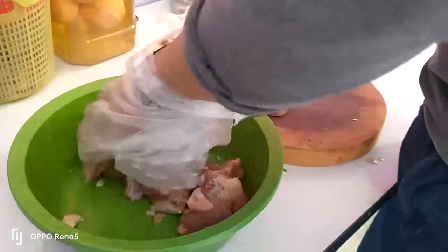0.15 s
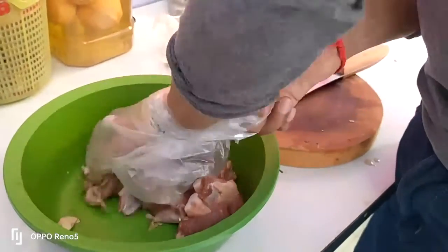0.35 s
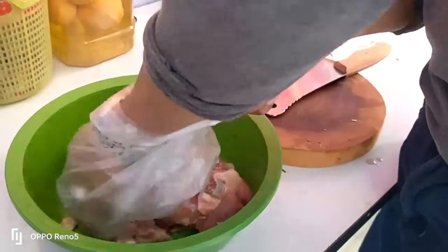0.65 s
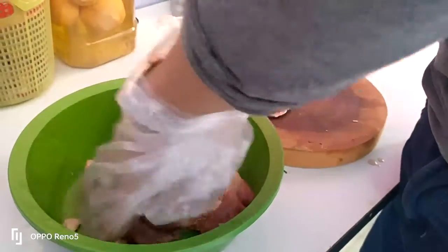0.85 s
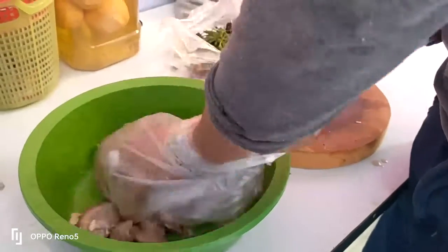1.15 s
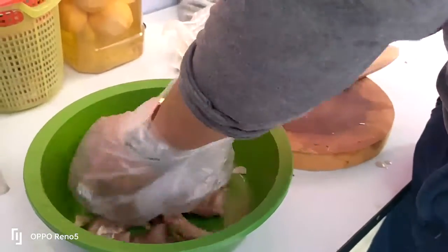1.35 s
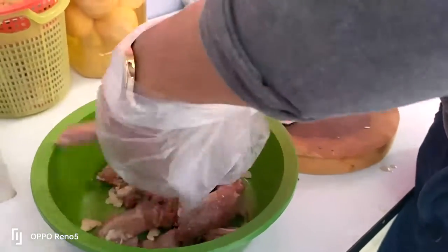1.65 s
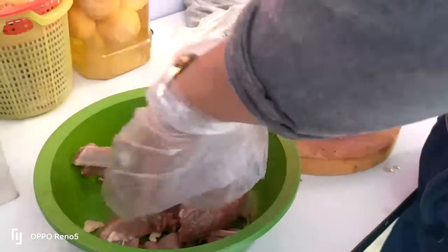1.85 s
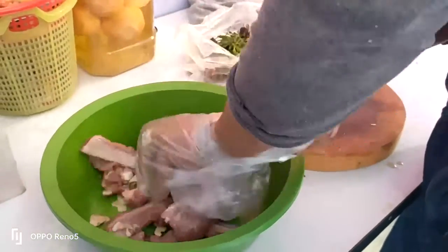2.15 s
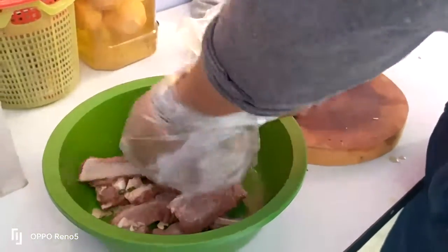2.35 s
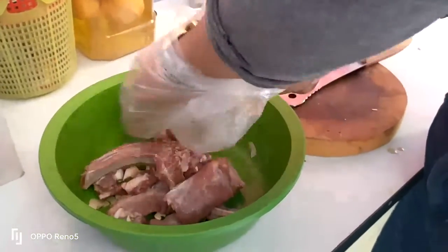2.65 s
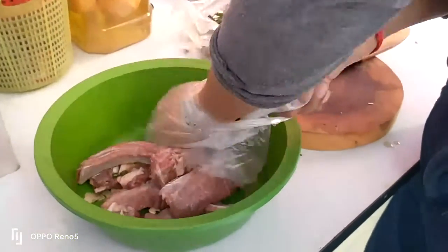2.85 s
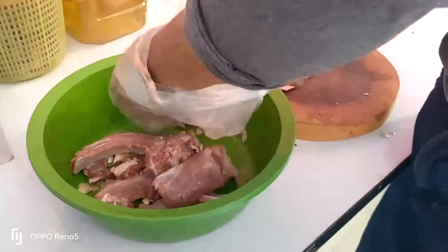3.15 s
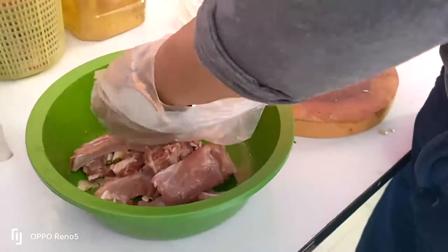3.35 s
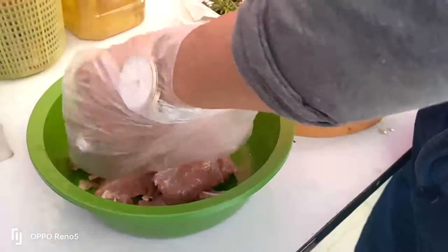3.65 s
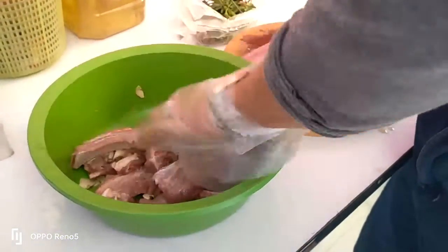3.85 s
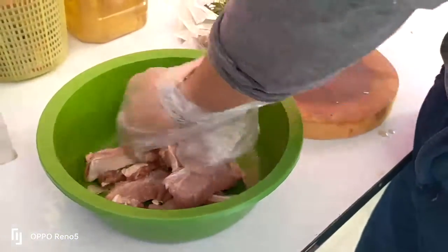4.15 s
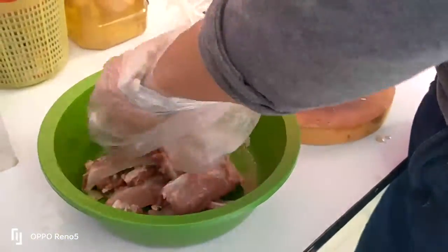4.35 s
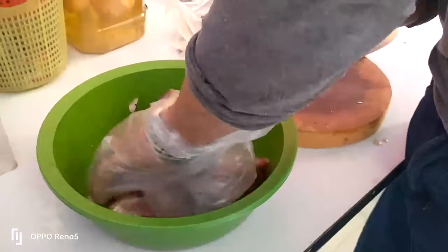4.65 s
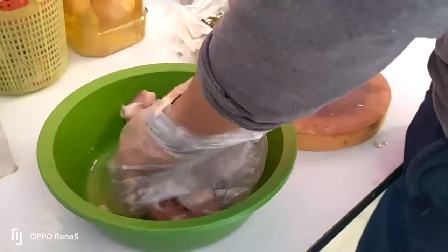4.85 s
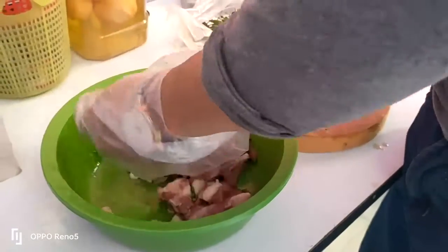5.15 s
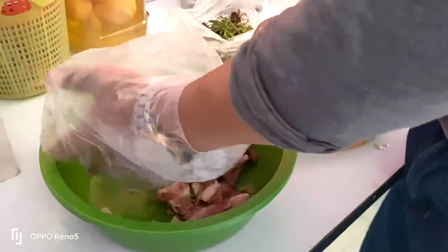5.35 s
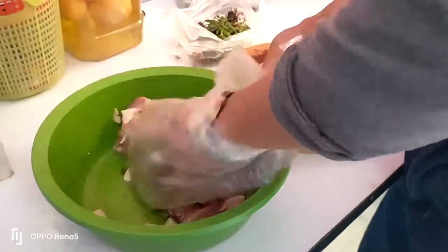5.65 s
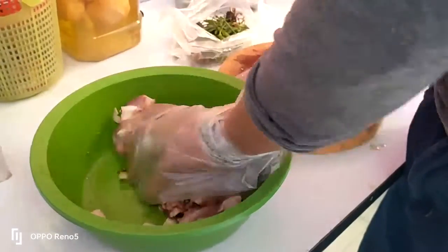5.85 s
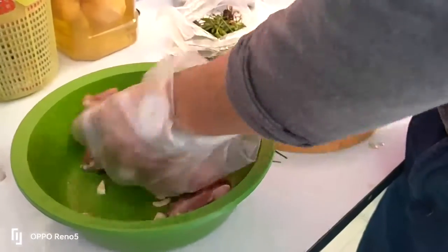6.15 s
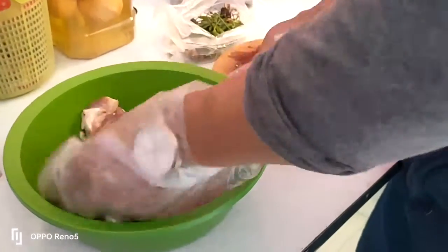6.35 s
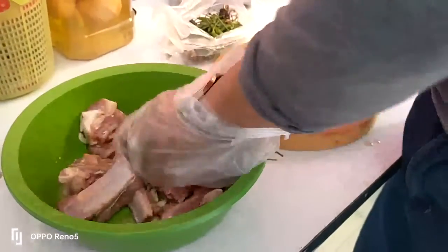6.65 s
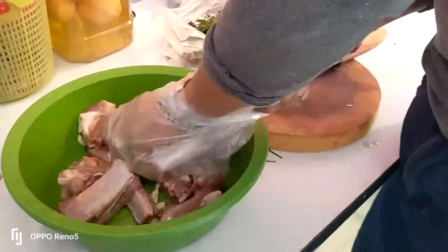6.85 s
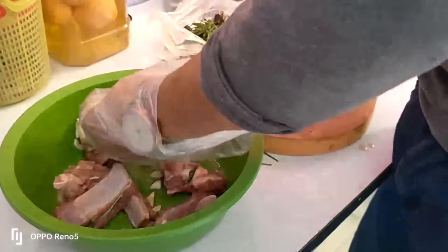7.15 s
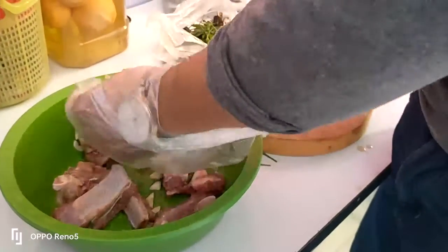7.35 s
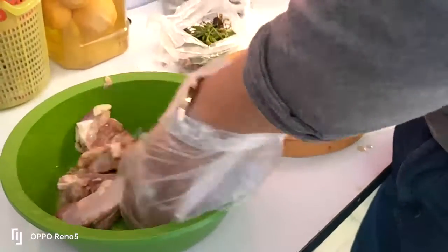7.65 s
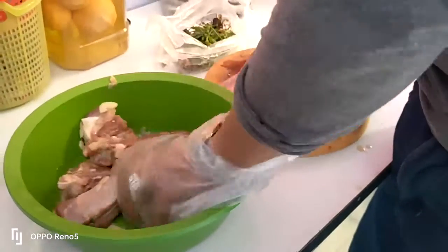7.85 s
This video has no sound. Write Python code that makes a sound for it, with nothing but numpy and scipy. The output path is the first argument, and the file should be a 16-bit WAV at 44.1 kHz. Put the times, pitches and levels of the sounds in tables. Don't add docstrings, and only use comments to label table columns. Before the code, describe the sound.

Busy crinkling of plastic film over soft meaty squelches, broken by sharp snaps and hollow bowl knocks, with faint dull thumps underneath.

```python
import sys
import numpy as np
from scipy import signal
from scipy.fft import rfft, irfft, dct, next_fast_len
from scipy.io import wavfile
from scipy.ndimage import uniform_filter1d

SR = 44100
rng = np.random.default_rng(int(sys.argv[2]) if len(sys.argv) > 2 else 0)


def master(y):
    cut = np.clip(np.atleast_2d(y).T, -1, 1)
    pcm = np.round(cut * 32767)
    wavfile.write(sys.argv[1], SR, pcm.astype(np.int16))


def volts_from_db(level):
    exponent = np.asarray(level, float) / 20
    return 10 ** exponent


N = 352359

# start_s, peak_db
THUDS = [(0.028, -58), (0.233, -42), (0.35, -43), (0.512, -40), (0.778, -39), (0.902, -45), (0.991, -46),
         (1.603, -41), (1.704, -53), (1.854, -50), (2.212, -48), (2.828, -45), (2.953, -40), (3.779, -44),
         (4.052, -44), (4.344, -50), (4.465, -56), (4.887, -37.5), (5.154, -39), (5.426, -49), (5.909, -67),
         (6.014, -45), (6.188, -57), (6.297, -43), (6.46, -42), (6.554, -42), (7.12, -42), (7.414, -47),
         (7.514, -38), (7.736, -57)]
THUD_RISE_S, THUD_FALL_S, THUD_HZ = 0.024, 0.032, 65.3
# freq_hz, density_db_per_hz
RUMBLE_COLOUR = [(12, -34), (20, 3), (65, 6), (86, 5.5), (136, -12), (211, -2), (300, -17), (390, -32),
                 (660, -120)]
RUMBLE_DB = -57.5
ROOM_T60_S, ROOM_CUT_HZ, ROOM_DB = 0.45, 2100, -18.5

# start_s, wall_db, hardness_db, wall_hz
KNOCKS = [(0.31, -35, 6, 263), (0.719, -42, -2, 218), (1.0, -16, -0.5, 197), (1.017, -17, -8, 165),
          (1.03, -21, 3, 249), (1.05, -23, -8, 150), (1.069, -23, 4, 466), (1.111, -29, 4, 363),
          (1.427, -19, 4.5, 504), (1.44, -26, -3, 169), (1.767, -12.5, -3, 347), (1.818, -24, -2, 323),
          (2.132, -28.5, 8, 236), (2.333, -27.5, 4, 191), (2.488, -30, 1, 200), (2.529, -30, -8, 221),
          (2.782, -34, -12, 183), (2.825, -21, -4, 240), (2.8294, -16.5, -3, 330), (3.191, -38, -12, 340),
          (3.582, -38, -4, 229), (3.901, -26, -4, 192), (3.971, -24.5, -1, 251), (4.029, -34, -3, 200),
          (4.349, -39, -4, 280), (4.4688, -12, -1.5, 215), (4.484, -15.5, -17, 185), (4.791, -30, 2, 260),
          (5.781, -31, -5, 300), (6.174, -32, -2, 217), (6.406, -23, -16, 353), (6.413, -17, -10, 296),
          (6.439, -24, -12, 253), (6.471, -20, -8, 233), (6.496, -23.5, -6, 320), (6.512, -22, -6, 282),
          (6.525, -30, -7, 190), (6.546, -29, -8, 252), (6.588, -37, -15, 228), (6.566, -28, -13, 310),
          (6.799, -31, 6, 302), (7.512, -22, -2, 281), (7.771, -23.5, -6, 235), (7.86, -31, 3, 236)]
# freq_hz, level_db, t60_s
BOWL_MODES = [(183, -9, 0.47), (280, -12, 0.1), (496, -2, 0.013), (712, 4.5, 0.049), (980, -3, 0.025),
              (1560, -22, 0.014)]
CRACK_DB, CRACK_HZ, CRACK_T60_S = -25, 1270, 0.0026
# start_s, peak_db, fall_s, pitch_hz
BOOMS = [(0.309, -39.5, 0.082, 114), (.565, -46, 0.025, 119), (.65, -50, .08, 226),
         (1.009, -34.5, 0.057, 114), (1.44, -45.5, 0.12, 113), (2.091, -49, 0.047, 121),
         (2.375, -52, .08, 114), (2.836, -28.5, 0.053, 114), (2.98, -46, .04, 110), (3.876, -47, .04, 115),
         (3.957, -45, 0.029, 116), (4.08, -50, 0.094, 204.5), (4.477, -24.5, 0.1, 114.5),
         (4.465, -31, .05, 190.4), (4.54, -39, 0.049, 188), (4.49, -40, 0.06, 287), (4.62, -45, 0.015, 304),
         (4.648, -40, 0.084, 118), (4.783, -51, .05, 119), (5.234, -47, .08, 327), (6.468, -34, 0.034, 120),
         (6.506, -41, 0.08, 117), (6.802, -42.5, 0.038, 116), (7.528, -31, 0.067, 117.3),
         (7.535, -47, .07, 174.4), (2.84, -45, 0.057, 185), (6.49, -45, 0.062, 182),
         (7.642, -47, 0.049, 120), (7.785, -50, 0.034, 116), (7.86, -49, 0.044, 117)]
BOOM_RISE_S = 0.00793

# start_s, peak_db, pitch_hz, pan_left_minus_right_db, noise_share_db
SNAPS = [(0.31, -27, 4150, -5, -3), (1.065, -10.5, 1950, -2, -6), (1.432, -26, 1787, -27, -21.5),
         (1.431, -22, 970, 0, -16), (1.768, -17, 1480, 0, -15), (1.822, -19, 2470, 5.5, -8),
         (2.3672, -20.5, 5160, 6, -9), (2.62, -19, 5800, -6, -20), (2.8047, -42, 4300, 3, -9),
         (2.8306, -14, 1670, 2.5, -20), (2.844, -20, 1900, 2, -12), (2.835, -6, 5620, -1, -19),
         (3.119, -11.5, 5540, -6, -22), (3.3382, -28, 4760, -6, -3), (3.8472, -27, 5600, 0, -20),
         (4.4696, -14.5, 2650, 15, -16), (4.481, -11, 2650, -1, -13), (5.638, -27, 4400, 6, -3),
         (5.7818, -10, 1990, 2, -19), (4.469, -9.5, 1930, 5, -16), (6.417, -16.5, 1420, -4, -11),
         (6.42, -10, 4040, 0, -14), (6.447, -12, 3140, 2, -14), (6.43, -18, 2000, 4, -7),
         (6.463, -15, 2830, -7, -7), (6.402, -18, 5070, -2, 2), (6.407, -19, 4500, -2, -5),
         (6.421, -17, 1420, -5, -12), (6.437, -12, 2600, 0, -15), (6.453, -18, 2200, 5, -10),
         (6.4728, -5, 1450, -4, -27), (6.471, -12.5, 2630, -4, -16), (7.5125, -12.5, 1980, -1, -21),
         (7.658, -22, 3900, 6, -1), (7.7715, -17.5, 2270, 6, -15)]
# start_s, peak_db, pitch_hz, pan_left_minus_right_db,
# noise_share_db
MORE_SNAPS = [(6.4168, -14, 6000, -8, 3), (7.5192, -23, 1920, 3, -12), (7.523, -17, 1950, 3, -17),
              (7.52, -24, 1350, 7, -17), (6.496, -15, 1400, -2, -10), (2.2, -21, 6000, 4, -1),
              (1.925, -21, 3500, -1, 2), (7.8, -25.5, 1500, 0, -4), (6.484, -26, 1300, 3, -14),
              (5.9, -17, 1630, 2, -12), (4.504, -15, 2600, 2, -10)]

# peak_s, film_db, fall_s, wetness_re_film_db
SQUEEZES = [(0.005, -28.5, 0.089, -18.5), (0.174, -26, 0.1, -22), (0.351, -26.5, 0.11, -14.5),
            (0.55, -26.5, 0.037, -13.5), (0.684, -31, 0.33, -20.5), (1.068, -26, 0.29, -18),
            (1.615, -31, 0.17, -20.5), (2.014, -25.5, 0.24, -16.5), (2.407, -30, 0.061, -16.5),
            (2.618, -29.5, 0.16, -17), (2.851, -21.5, 0.06, -13.5), (3.049, -30, 0.16, -20.5),
            (3.394, -32, 0.079, -20.5), (3.611, -27.5, 0.075, -16), (3.956, -24, 0.21, -16),
            (4.344, -29.5, 0.09, -15.5), (4.492, -23, 0.04, -18), (4.618, -25.5, 0.074, -14),
            (4.731, -29, 0.04, -16.5), (4.98, -29.5, 0.3, -20.5), (5.442, -32, 0.16, -17.5),
            (5.65, -28.5, 0.058, -22), (5.781, -26, 0.14, -13.5), (6.044, -31, 0.29, -19.5),
            (6.443, -28, 0.13, -16.5), (6.766, -29, 0.16, -14), (7.136, -30.5, 0.11, -18.5),
            (7.353, -32, 0.065, -23), (7.548, -32.5, 0.1, -13.5), (7.841, -25.5, 0.2, -15)]
RISE_SHARE, REST_DB, WET_REST_DB = 0.65, -40, -50
# peak_s, film_db
CRINKLES = [(.31, -27.5), (.425, -28), (1.917, -25.5), (2.15, -28), (2.66, -28.5), (3.12, -32), (3.94, -26),
            (4.14, -29.5), (5.12, -33), (5.506, -30.5), (5.785, -18), (5.94, -32), (6.407, -26),
            (6.43, -26.5), (5.64, -27), (7.97, -36)]
CRINKLE_RISE_S, CRINKLE_FALL_S = 0.016, 0.019
# time_s, sheen_re_film_db
TAUTNESS = [(0, -20), (.7, -19.5), (1.1, -19.5), (1.7, -19), (1.93, -17.5), (2.3, -20), (2.75, -18),
            (3.0, -19.5), (3.42, -20.5), (3.75, -16.5), (4.1, -20), (5.0, -19), (5.6, -17.5), (5.948, -21),
            (6.3, -17), (6.45, -19), (6.7, -19), (8, -18)]
HUSHES_S = [.9, 1.24, 2.591, 2.98, 3.3, 3.45, 4.201, 4.45, 5.05, 5.3, 5.37, 5.62, 6.88, 7.47, 7.494]
HUSH_S, HUSH_SHARE = 0.012, 0.72
# centre_s, half_length_s, depth_db
DIPS = [
    (2.588, 0.011, -26),
    (3.5, 0.0076, -1),
    (3.2, 0.017, -18),
    (6.877, 0.0065, -22),
    (7.467, 0.011, -16),
    (4.436, .016, 1),
    (6.9, .022, -18),
    (8.7, 0.016, -3),
    (5.8, 0.019, -11),
]
DIP_FILM_SHARE = 0.077
SLOP_DB, SLOP_S = -25, 0.072
FLURRY_DB, FLURRY_S = -17.5, 0.011
PAN_DB, SWAY_DB = 0.45, -0.8

# freq_hz, density_db_per_hz
FILM_LEFT = [(700, -19), (1400, -8.5), (2100, 1), (2750, 2), (3480, -2), (4100, 3), (4900, -7), (5800, 1.5),
             (6500, -6.5), (6900, -3), (7600, -8), (8150, -15)]
FILM_RIGHT = [(700, -46), (1400, -5.5), (2100, -2.5), (2750, 0.5), (3480, -1), (4100, 1), (4600, 1),
              (5800, 3), (6500, -1.5), (7000, -4), (7400, -13), (7560, -12), (7850, -16), (8100, -39)]
SHEEN_LEFT = [(7900, -12), (8400, 0), (11300, -2.5), (11800, -3.5), (13200, -2), (14800, -9), (15800, -2)]
SHEEN_RIGHT = [(7900, -16), (8900, -5), (10000, -10.5), (11200, -4), (12400, -14), (13600, -3),
               (15800, -18)]
# freq_hz, density_db_per_hz
SQUELCH_COLOUR = [(76, -18), (130, -15), (236, -3), (377, -5.5), (531, -3.5), (792, -6), (919, -0.5),
                  (2000, -8), (2600, -67), (4400, -120)]
# freq_hz, share
LIKENESS = [(60, 0.66), (300, 0.77), (640, 0.59), (1400, 0.47), (3000, 0.095), (4300, 0.36), (6000, 0.15),
            (15000, 0.1)]
PORT_LAG_S = -0.000211

# freq_hz, share_of_surrounding_power
GATE_LEFT = [(600, 0), (1500, .15), (2800, .22), (6000, .16), (7300, .36), (8150, 1.1), (8500, .4),
             (13000, .45), (15000, .55)]
GATE_RIGHT = [(600, 0), (1500, .15), (2800, .22), (6000, .16), (7800, .3), (8200, 1.4), (8900, 1.1),
              (9800, .55), (13000, .55), (15000, .65)]
# freq_hz, flicker_db
MOTTLE = [(300, 1.2), (1500, 3.2), (4000, 6.5), (7000, 9), (15000, 11)]
# centre_s, length_s
GAPS = [(0.122, 0.059), (0.615, 0.05), (0.669, 0.012), (0.943, 0.044), (1.012, 0.016), (1.252, 0.045),
        (1.447, 0.038), (1.66, 0.027), (1.83, 0.053), (2.368, 0.047), (2.515, 0.036), (2.59, 0.024),
        (2.736, 0.054), (2.985, 0.028), (3.207, 0.067), (3.325, 0.13), (3.455, 0.07), (4.242, 0.089),
        (4.437, 0.039), (4.649, 0.037), (5.019, 0.059), (5.197, 0.079), (5.394, 0.059), (5.953, 0.036),
        (6.043, 0.096), (6.974, 0.03), (7.071, 0.05), (7.196, 0.057), (7.47, 0.043), (7.974, 0.042)]
GAP_DB_PER_S, GAP_MAX_DB = 950, 52
HOP, LEAD = 1024, 1361
ATTACK_CREST = 5.2
NOTCH_HZ, NOTCH_WIDTH_HZ, NOTCH_DB = 3485, 90, -6
TOP_HZ, BUSY_SHARE = 15100, .8


def rms_one(x):
    return x / np.sqrt(np.mean(x ** 2) + 1e-20)


def at_hz(points, hz):
    points = np.array(points)
    return np.interp(np.log(hz + 1), np.log(points[:, 0]), points[:, 1])


def drift(rate_hz):
    r = np.exp(-80 * np.pi * rate_hz / SR)
    slow = signal.lfilter([1], [1, -2 * r, r * r], rng.standard_normal(N // 40 + 2002))[2000:]
    return np.interp(np.arange(N) / 40, np.arange(len(slow)), rms_one(slow))


def ring(clicks, hz, t60_s):
    r = volts_from_db(-60 / (t60_s * SR))
    w = 2 * np.pi * hz / SR
    return signal.lfilter([0, np.sin(w)], [1, -2 * r * np.cos(w), r * r], clicks + 1e-18)


def struck(times_s, levels_db, contact_s):
    clicks = np.zeros(N)
    np.add.at(clicks, (np.asarray(times_s) * SR).astype(int), volts_from_db(levels_db))
    r = np.exp(-1 / (contact_s * SR))
    return signal.lfilter([(1 - r) ** 2], [1, -2 * r, r * r], clicks + 1e-18)


def bell(since_s, rise_s, fall_s):
    return np.exp(-(since_s / np.where(since_s < 0, rise_s, fall_s)) ** 2)


def swells(times_s, levels_db, rise_s, fall_s):
    t = np.arange(0, N, 64) / SR
    power = bell(t[:, None] - times_s, rise_s, fall_s) @ volts_from_db(levels_db) ** 2
    return np.interp(np.arange(N) / SR, t, power)


def hums(rows, rise_s, wobble_db):
    out, t = np.zeros(N + SR), np.arange(SR // 2) / SR
    lead_s = 3 * rise_s
    for s, db, fall_s, hz in rows:
        at = int((s - lead_s) * SR) + SR // 4
        out[at:at + len(t)] += volts_from_db(db) * bell(t - lead_s, rise_s, fall_s) * np.sin(2 * np.pi * hz * t)
    return out[SR // 4:SR // 4 + N] * volts_from_db(wobble_db * drift(13))


def grains(per_s, spread_db, low_hz, high_hz, cycles, clump_db, patchy_db):
    chance = per_s * volts_from_db(clump_db * drift(14)) / SR
    sizes = volts_from_db(spread_db * np.minimum(rng.exponential(1, (4, N)), 5)) * rng.choice([-1, 1], (4, N))
    clicks = sizes * (rng.random((4, N)) < chance)
    dealt = rng.integers(0, 10, (4, N))
    out = 0
    for k, hz in enumerate(np.geomspace(low_hz, high_hz, 10)):
        out = out + volts_from_db(patchy_db * drift(7.8)) * ring(clicks * (dealt == k), hz, cycles / hz)
    return out


def at_ports(swarms, left, right):
    size = next_fast_len(N)
    hz = np.arange(size // 2 + 1) * SR / size
    spectra = rfft(swarms, size)
    spectra /= np.sqrt(uniform_filter1d(np.mean(abs(spectra) ** 2, axis=0), size=2400))
    common = np.clip(at_hz(LIKENESS, hz), 0, 1)
    late = np.exp(-2j * np.pi * hz * PORT_LAG_S)
    shared = np.array([spectra[0] + late * spectra[1], spectra[0] + spectra[1]]) / np.sqrt(2)
    mixed = np.sqrt(common) * shared + np.sqrt(1 - common) * spectra[2:]
    band = (hz > left[0][0]) * (hz < left[-1][0])
    colour = volts_from_db(np.array([at_hz(left, hz), at_hz(right, hz)])) * band
    return rms_one(irfft(mixed * colour, size)[:, :N])


def dipping():
    s, half_s, db = np.transpose(DIPS)
    return -swells(s, 10 * np.log10(np.maximum(-db, .1)), half_s, half_s)


def hushing():
    lost = swells(np.array(HUSHES_S), np.zeros(len(HUSHES_S)), HUSH_S, HUSH_S)
    return np.clip(1 - HUSH_SHARE * lost, .02, 1)


def pounding():
    rows = [(s + 0.0243, db, THUD_FALL_S, THUD_HZ * rng.uniform(0.933, 1.07)) for s, db in THUDS]
    blows = hums(rows, THUD_RISE_S, wobble_db=3.0)
    rumble = at_ports(rng.standard_normal((4, N)), RUMBLE_COLOUR, RUMBLE_COLOUR)
    return blows + volts_from_db(RUMBLE_DB + 0.82 * dipping() + 2.9 * drift(9.2)) * rumble


def kitchen(x):
    size = next_fast_len(N + SR)
    hz = np.arange(size // 2 + 1) * SR / size
    out = np.zeros((2, len(hz)), complex)
    for k, lag_s in enumerate(rng.uniform(0.0061, 0.07, 12)):
        loss = volts_from_db(-60 * lag_s / ROOM_T60_S) / (1 + 1j * hz / ROOM_CUT_HZ)
        loop = loss * np.exp(-2j * np.pi * hz * lag_s)
        out[k % 2] += loop / (1 - loop) * hz / (hz + 300) * (-1) ** (k // 2)
    return irfft(out * rfft(x, size), size)[:, :N]


def booms():
    return hums([(s + 0.01157, *rest) for s, *rest in BOOMS], BOOM_RISE_S, wobble_db=1.0)


def knocks():
    s, wall_db, hard_db, wall_hz = np.transpose(KNOCKS)
    out = np.zeros(N)
    lucks_db = rng.normal(0, 3.0, (len(BOWL_MODES), len(s)))
    for (hz, db, t60_s), luck_db in zip(BOWL_MODES, lucks_db):
        push_db = wall_db + db - 15.5 + luck_db + hard_db * (hz > 450)
        out += ring(struck(s + 0.00295, push_db, .00006), hz, t60_s)
    out += ring(struck(s + 0.0015, wall_db + hard_db + CRACK_DB, .00008), CRACK_HZ, CRACK_T60_S)
    t = np.arange(3000) / SR
    for k, noise in enumerate(rng.standard_normal((len(s), 3000))):
        note = np.sin(2 * np.pi * wall_hz[k] * t) * t / 0.0048 * np.exp(1 - t / 0.0031)
        slosh = rms_one(ring(noise, 340, 0.0033)) * np.exp(-t / 0.03)
        at = int(s[k] * SR)
        out[at:at + 3000] += (note * volts_from_db(-3.0) + slosh * volts_from_db(-16.5)) * volts_from_db(wall_db[k])
    return signal.sosfilt(signal.butter(2, 140, "high", fs=SR, output="sos"), out)


def snaps():
    out, t = np.zeros((2, N)), np.arange(4000) / SR
    rise = t / 0.00089 * np.exp(1 - t / 0.00088)
    film_top = signal.butter(4, 7300, fs=SR, output="sos")
    for s, db, hz, pan_db, noise_db in SNAPS + MORE_SNAPS:
        noise = rng.standard_normal((2, 4000))
        note = rise * (np.sin(2 * np.pi * hz * t) + 0.21 * np.sin(2 * np.pi * 1.2 * hz * t))
        hiss = ring(np.diff(noise, prepend=0), 4800, 0.0008)
        bright = rms_one(signal.sosfilt(film_top, hiss))
        tail = rms_one(ring(noise[:, ::-1], hz, 0.007)) * np.exp(-t / 0.009)
        burst = note * volts_from_db(-3.5) + bright * rise * volts_from_db(noise_db) + tail * volts_from_db(-12.5)
        at = int(s * SR)
        out[:, at:at + 4000] += burst * volts_from_db(db + pan_db * np.array([[.5], [-.5]]))
    return out


def squelch():
    s, db, fall_s, wet_db = np.transpose(SQUEEZES)
    knock_s, wall_db, hard_db = np.transpose(KNOCKS)[:3]
    juice = volts_from_db(WET_REST_DB) ** 2 + swells(s, db + wet_db, RISE_SHARE * fall_s, fall_s)
    juice += swells(knock_s + 0.0048, wall_db + hard_db + SLOP_DB, 0.0046, SLOP_S)
    juice *= hushing() * volts_from_db(dipping()) ** 2
    wet = grains(2500, 3.3, 138, 2060, cycles=5.5, clump_db=1.5, patchy_db=4.5)
    return at_ports(wet, SQUELCH_COLOUR, SQUELCH_COLOUR) * np.sqrt(juice) * volts_from_db(2.5)


def film():
    s, db, fall_s, _ = np.transpose(SQUEEZES)
    snap_s, snap_db = np.transpose(SNAPS)[:2]
    dip_db, hush = dipping(), hushing()
    force = volts_from_db(REST_DB) ** 2 + swells(s, db, RISE_SHARE * fall_s, fall_s)
    force += swells(snap_s, snap_db + FLURRY_DB, 0.0037, FLURRY_S)
    force += swells(*np.transpose(CRINKLES), CRINKLE_RISE_S, CRINKLE_FALL_S)
    force *= volts_from_db(DIP_FILM_SHARE * dip_db + 0.63 * drift(14)) ** 2
    swarms = grains(12000, 1.66, 1360, 7190, cycles=7.15, clump_db=1.0, patchy_db=0.45)
    crackle = at_ports(swarms, FILM_LEFT, FILM_RIGHT) * volts_from_db(1.5)
    sheen_db = np.interp(np.arange(N) / SR, *np.transpose(TAUTNESS)) + 2.0 + 0.7 * drift(16) + 0.51 * dip_db
    sheen = at_ports(rng.standard_normal((4, N)), SHEEN_LEFT, SHEEN_RIGHT) * volts_from_db(sheen_db)
    pan_db = PAN_DB + SWAY_DB * drift(6.8)
    rustle = crackle * hush ** 0.048 + sheen * hush ** 0.32
    return np.sqrt(force) * rustle * volts_from_db(pan_db * [[.5], [-.5]])


def cell_mean(x, bins, frames):
    return uniform_filter1d(uniform_filter1d(x, size=bins, axis=2), size=frames, axis=1)


def gate(x):
    count, half = (N + LEAD) // HOP + 1, HOP // 2
    window = np.sin(np.pi * (np.arange(2 * HOP) + .5) / (2 * HOP))
    padded = np.pad(x, ((0, 0), (LEAD, (count + 1) * HOP - N - LEAD)))
    frames = padded[:, np.arange(count)[:, None] * HOP + np.arange(2 * HOP)] * window
    a, b, c, d = np.split(frames, 4, axis=2)
    cells = dct(np.concatenate([-c[..., ::-1] - d, a - b[..., ::-1]], axis=2), type=4, norm="ortho")
    hz = (np.arange(HOP) + .5) * SR / (2 * HOP)
    t = ((np.arange(count) + 1) * HOP - LEAD) / SR

    waver = 0.72 * rng.standard_normal(cells.shape) + rng.standard_normal(cells.shape[1:])
    waver = rms_one(cell_mean(waver, 4, 2))
    peak, spread = abs(frames).max(axis=(0, 2)), frames.std(axis=(0, 2))
    calm = (peak < ATTACK_CREST * spread * np.sqrt(2))[:, None]
    loud_s = np.array([s for s, db, *_ in SNAPS if db > -17])
    calm = calm * (abs(t[:, None] - loud_s).min(axis=1, keepdims=True) > .018)
    cells = cells * volts_from_db(at_hz(MOTTLE, hz) * (np.minimum(waver, 1.3) * calm - .4))

    busy = np.log(np.mean(cells[..., hz > 2000] ** 2, axis=(0, 2))) + rng.normal(0, 1.1, count)
    cells = cells * volts_from_db(NOTCH_DB * np.exp(-((hz - NOTCH_HZ) / NOTCH_WIDTH_HZ) ** 2))
    cells = cells * ~np.outer(busy > np.quantile(busy, BUSY_SHARE), hz > TOP_HZ)

    patch = cell_mean(cells ** 2, 5, 2)
    around = cell_mean(cells ** 2, 61, 3)
    jump_db = np.zeros(count)
    for s, length_s in GAPS:
        jump_db += min(GAP_DB_PER_S * length_s, GAP_MAX_DB) * (abs(t - s) < length_s / 2 + .002)
    reach = (hz > 8100) * .5 + (hz > 400) * (hz < 1200) * .3
    threshold = np.array([at_hz(GATE_LEFT, hz), at_hz(GATE_RIGHT, hz)])[:, None] * around * calm
    threshold[1] *= volts_from_db(np.outer(jump_db, reach))
    keep = (patch > .8 * threshold) * (cells ** 2 > .07 * threshold)

    kept = dct(cells * keep, type=4, norm="ortho")
    u, v = kept[..., :half], kept[..., half:]
    frames = np.concatenate([v, -v[..., ::-1], -u[..., ::-1], -u], axis=2) * window
    joined = frames[:, 1:, :HOP] + frames[:, :-1, HOP:]
    return joined.reshape(2, -1)[:, LEAD - HOP:LEAD - HOP + N]


def scene():
    hits = knocks() + booms()
    left_hits = np.interp(np.arange(N) - PORT_LAG_S * SR, np.arange(N), hits) * volts_from_db(.3)
    bowl = np.array([left_hits, hits])
    return pounding() + volts_from_db(ROOM_DB) * kitchen(hits) + bowl + snaps() + squelch() + film()


def band_limit(x):
    return signal.sosfilt(signal.butter(12, 15900, fs=SR, output="sos"), x)


def record(dry):
    mix = gate(dry)
    return band_limit(mix)


dry = scene()
out = record(dry)
master(out)
```